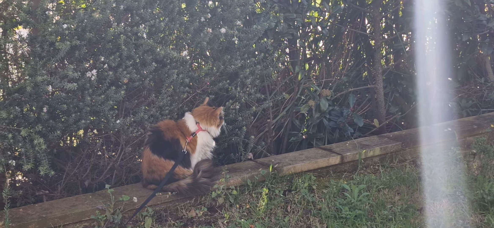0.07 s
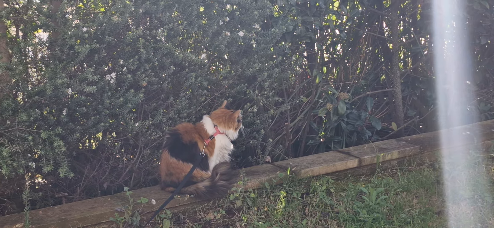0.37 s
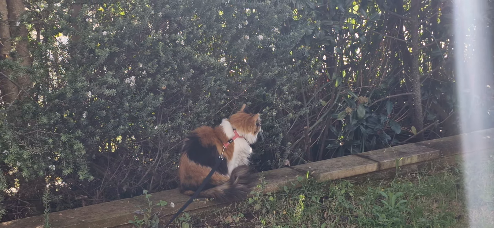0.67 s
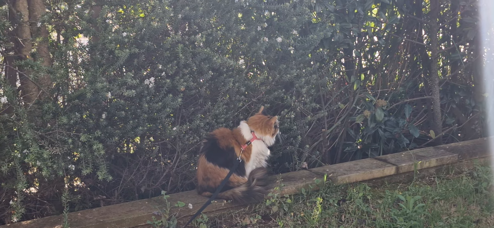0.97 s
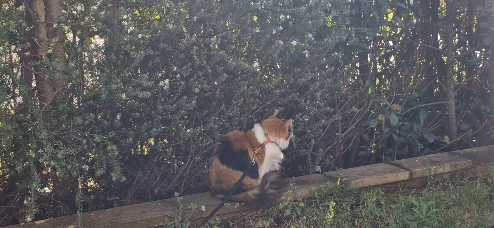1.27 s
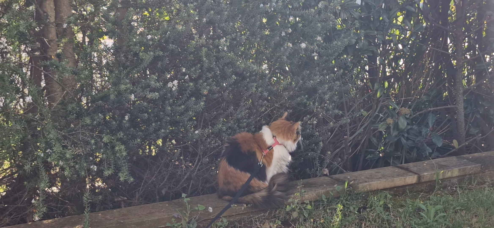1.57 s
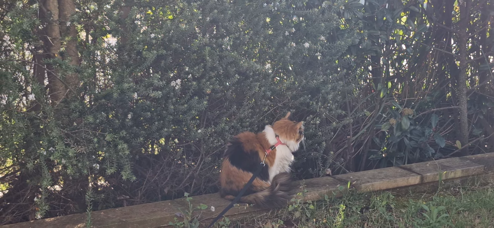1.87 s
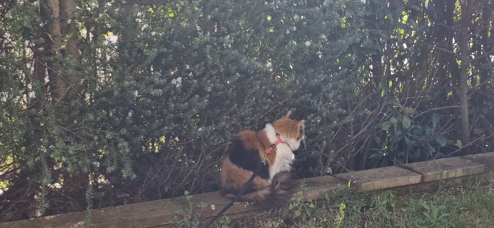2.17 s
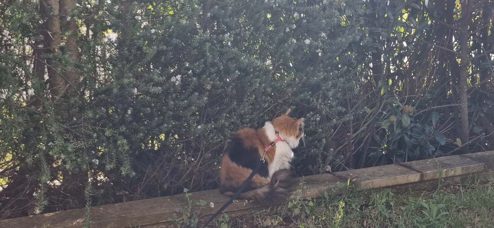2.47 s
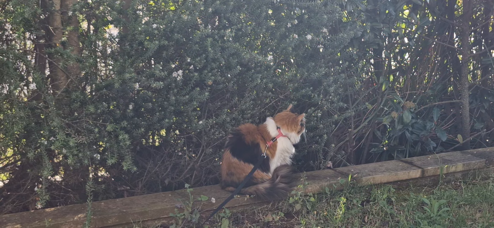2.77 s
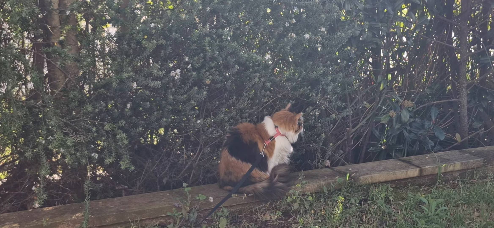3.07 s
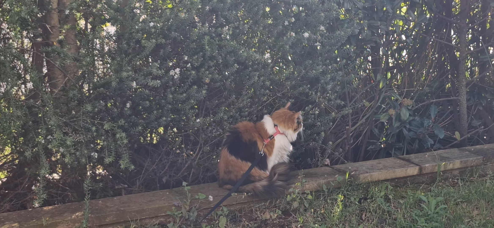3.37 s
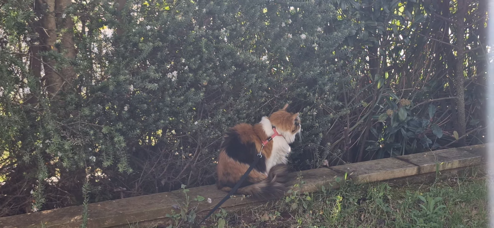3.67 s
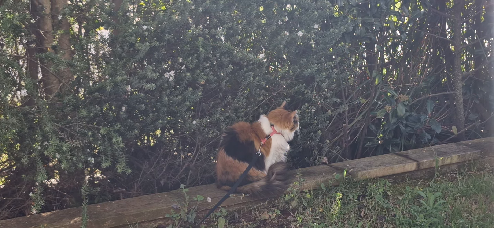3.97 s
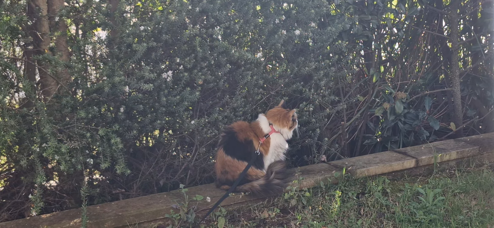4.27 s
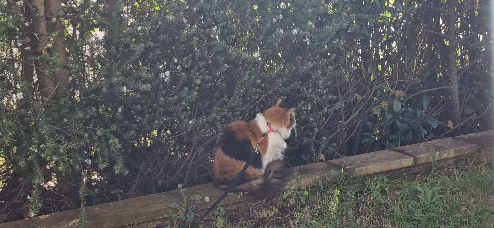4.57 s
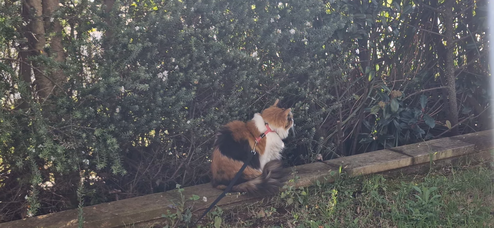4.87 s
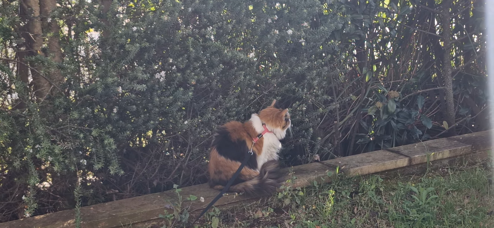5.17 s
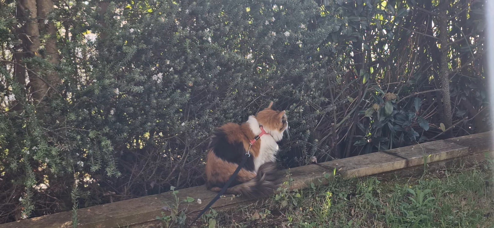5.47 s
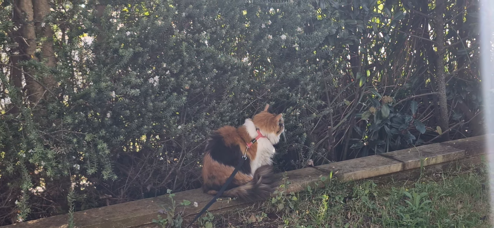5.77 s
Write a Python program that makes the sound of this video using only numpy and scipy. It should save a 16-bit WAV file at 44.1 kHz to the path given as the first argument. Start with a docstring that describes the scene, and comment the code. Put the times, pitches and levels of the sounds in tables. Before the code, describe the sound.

A vehicle passes with a low engine hum that swells and fades, while faint birds chirp in a garden and soft handling ticks sound close by.

```python
"""Coasting past the hedge

A vehicle rolls by behind a garden hedge, its exhaust hum sinking in pitch as the engine slows,
while the tyre noise swells and recedes. Close by, a hand shifts on the camera: sliding skin
gives soft rubs, the slipping grip small ticks. A few small birds chirp over the town's rumble."""
import sys
import numpy as np
from scipy import signal
from scipy.fft import rfft, irfft
from scipy.io import wavfile
from scipy.ndimage import uniform_filter1d

SR = 44100
rng = np.random.default_rng(int(sys.argv[2]) if len(sys.argv) > 2 else 0)


def output_pcm(signal):
    """Save a mono or channel-first signal as 16-bit PCM at the path in sys.argv[1].

    Samples are clipped to [-1, 1] before scaling.
    """
    pcm = np.clip(np.atleast_2d(signal).T, -1, 1) * 32767
    wavfile.write(sys.argv[1], SR, np.round(pcm).astype(np.int16))


N = 265526
TIME = np.arange(N) / SR
ABREAST_S = 2.115  # the vehicle is nearest


# The engine winding down, as its cycle rate: t/s, f/Hz
CYCLE_RATE = [(0.1, 32.2), (0.6, 31.93), (1.28, 31.4), (1.64, 30.4), (2.09, 28.1), (2.21, 28.1),
              (2.5, 27.31), (2.87, 25.8), (3.05, 24.8), (3.55, 23.3), (3.9, 21.7)]
# Fader ride on the exhaust hum: t/s, level/dB
HUM_RIDE = [(0, -38), (.8, -28.5), (1.5, -33), (1.8, -31.5), (2.05, -32), (2.35, -28.5), (2.7, -35),
            (3.05, -31.5), (3.25, -40.5), (3.5, -37), (4, -42.5)]
# Body of the hum, from uneven firings: multiple of the cycle rate, level/dB
HUM_ORDERS = [(2, 0), (3, -6.5), (4, -.5), (5, -8.5), (6, -3), (7, -12)]
# Exhaust and street resonances; an order blooms as it slides through one: f/Hz, level/dB
RESONANCES = [(42, -14.5), (47, 1.5), (52, -10.5), (56, -19), (75, -15), (94, -7.5), (101, -5), (109, -2),
              (114, -21), (120, -4), (127, 4), (151, -14.5), (166, 4), (180, 1), (186, -13), (220, -15.5)]
# Faint upper orders riding on the roar: multiple of the cycle rate, level/dB
UPPER_ORDERS = [(8, -16), (9, -13), (10, -12), (11, -15), (12, -14)]
# Dark EQ of the roar: f/Hz, level/dB
ROAR_EQ = [(40, -12.5), (90, 3.5), (170, 5.5), (225, -7), (290, -0.5), (350, -10.5), (420, -7.5),
           (620, -20), (1200, -24), (3000, -59.5)]

def engine():
    """Uneven firings make a hum that slides through resonances; the exhaust roar pulses with them."""
    sag_hz_per_s, fade_db_per_s = 1.4, 8.5  # it slows and dies away down the street
    gone_s = np.maximum(TIME - CYCLE_RATE[-1][0], 0)
    cycle_hz = curve(CYCLE_RATE) - sag_hz_per_s * gone_s
    angle = 2 * np.pi * np.cumsum(cycle_hz * (1 + 0.0018 * drift(6.8))) / SR
    hum = upper = 0
    for order, db in HUM_ORDERS:
        gain = amp(db + read(RESONANCES, order * cycle_hz) + 0.8 * drift(8.5))
        hum += gain * np.sin(order * angle + 0.13 * drift(3.5))
    for order, db in UPPER_ORDERS:
        gain = amp(db) * (1 + 0.58 * drift(3))
        upper += gain * np.cos(order * angle + 1.2 * drift(3.6))
    roar = amp(2.95) * noise(ROAR_EQ, patchy_db=0.5) * (1 + 0.043 * np.cos(angle))
    hum_db = curve(HUM_RIDE) - fade_db_per_s * gone_s
    roar_db = -41.5 + pass_by(near_s=1.39, loss_db=47.5) + swell(at_s=3.53, half_width_s=0.2, db=4.6)
    return amp(hum_db) * np.sqrt(2) * hum + amp(roar_db) * (roar + np.sqrt(2) * upper)


# Three EQs for the tyre wash (coming, abreast, going): f/Hz, level/dB
COMING_EQ = [(200, -14), (550, -5.5), (850, 3), (1200, -1.5), (1650, 0.5), (2300, -9), (3200, -9.5),
             (4500, -21.5), (6500, -36), (10000, -41.5)]
ABREAST_EQ = [(200, -16.5), (550, 0.5), (800, 1), (1200, -4), (1650, -1), (2400, -4), (3200, -9.5),
              (4500, -20), (6500, -29.5), (10000, -38)]
GOING_EQ = [(200, 2), (600, -15), (850, 1), (1150, 1.5), (1400, 4.5), (1650, -2), (2300, -9), (3200, -15.5),
            (4500, -26.5), (7000, -42.5)]

def tyres():
    """Tyres on the road: a wash that changes colour as the vehicle comes, draws level and goes."""
    solo_s = [1.8, 2.7, 3.9]  # each EQ plays alone here, with crossfades between
    road = 0
    for share, eq in zip(np.eye(3), [COMING_EQ, ABREAST_EQ, GOING_EQ]):
        crossfade = np.sqrt(np.interp(TIME, solo_s, share))
        road += crossfade * noise(eq, patchy_db=1.2, size=1024)
    ride_db = pass_by(near_s=1.017, loss_db=26.5) + swell(at_s=4.14, half_width_s=0.51, db=5.15)
    return road * amp(-47 + ride_db + 0.6 * drift(3.2))


# Finger strokes on the case: t/s, length/s, level/dB
RUB_CUES = [(.74, .72, -73.5), (1.68, 0.55, -73), (2.14, 0.33, -65.5), (2.5, 0.61, -69.5),
            (3.386, 0.37, -66), (5.773, 0.22, -66.5)]
# Bright EQ of the rubs: f/Hz, level/dB
RUB_EQ = [(1500, -17.5), (3500, 12), (5500, 5.5), (7000, 0), (8500, -1.5), (10000, -8.5), (12500, 2),
          (15500, -3)]
# Narrower EQ of the swish: f/Hz, level/dB
SWISH_EQ = [(2500, -30.5), (3900, -2), (4600, 5.5), (5300, -2.5), (6250, -1.5), (6800, -13), (7900, -15),
            (9800, -35), (12600, -18), (13800, -24), (15200, -15.5), (16200, -34)]

def hand_rubs():
    """Skin slides on the case in a fine grainy hiss; one longer stroke swishes on the right."""
    strokes = [amp(db) * stroke(start, length, edge_s=0.13) for start, length, db in RUB_CUES]
    pressure = np.sqrt(sum(envelope ** 2 for envelope in strokes))
    grain = amp(2.5 + 0.8 * drift(150))
    rub = pressure * grain * noise(RUB_EQ, patchy_db=0, size=256)
    swish_s, slacken_db_per_s = 2.48, 16.5
    swish_db = -55.5 - slacken_db_per_s * (TIME - swish_s) + drift(60)
    swish_gain = stroke(swish_s, length_s=1.0, edge_s=0.25) * amp(swish_db)
    swish = swish_gain * noise(SWISH_EQ, patchy_db=2.5, size=512)
    return rub + swish * pan(-7.5)


# Small dry ticks of the case: t/s, level/dB, ring f/Hz, ring width/Hz
TICK_CUES = [(2.2702, -47, 13990, 4000), (2.2815, -42, 14000, 3000), (2.2952, -33, 3100, 2500),
             (2.3103, -41, 4500, 7000), (2.324, -41, 12500, 3000), (2.332, -28, 3700, 1900),
             (2.3306, -39, 13600, 4000), (2.356, -32, 2820, 1500), (2.3562, -37, 5340, 2000),
             (2.412, -48.5, 5960, 9000), (3.503, -48, 5430, 1200), (4.1362, -43, 14200, 4480),
             (5.172, -54, 12500, 4920), (5.188, -36, 1150, 2600), (5.188, -54, 9500, 6000),
             (5.325, -60, 7600, 900), (5.63, -57, 12800, 5000), (5.8, -42.5, 1990, 1200),
             (5.899, -51, 13500, 7000)]

def grip_ticks():
    """The grip sticks and slips in ticks, the higher ones shorter, and softly bumps the case once."""
    hits = [(start, case_hit(db, hz, width, decay_s=0.0019 * (4000 / hz) ** 0.36))
            for start, db, hz, width in TICK_CUES]
    hits.append((5.812, case_hit(db=-38.5, hz=298, width_hz=540, decay_s=0.048)))  # the bump
    track = np.zeros((2, N))
    for start, hit in hits:
        for channel, sound in zip(track, hit):
            add(channel, start, sound)
    return track * pan(-2.3)


def case_hit(db, hz, width_hz, decay_s):
    """A snap and a dying noise burst ring one resonance of the case, in stereo."""
    t = np.arange(4096) / SR
    shared, left, right = rng.standard_normal((3, len(t))) * np.exp(-t / decay_s)
    snap = 5 * (t == 0)
    excitation = snap + shared + 0.86 * np.array([left, right])
    detune = (np.fft.rfftfreq(len(t), 1 / SR) - hz) / (width_hz / 2)
    hit = irfft(rfft(excitation) / (1 + 1j * detune) ** 2)
    return hit * amp(db) / abs(hit.mean(0)).max()


# A sprinkle of faint chirps: t/s, length/s, f/Hz, glide/octaves, level/dB
CHIRP_CUES = [(0.253, 0.047, 4700, -0.073, -58), (0.327, 0.064, 4670, -.08, -53),
              (0.408, 0.025, 4050, -.2, -55), (0.672, 0.028, 4600, -0.0038, -57),
              (0.753, 0.039, 3730, .22, -58), (1.684, 0.021, 3350, 0.33, -48),
              (1.902, 0.026, 4660, -.04, -56.5), (3.181, 0.054, 4480, -0.23, -53),
              (4.19, 0.049, 4190, 0.12, -59), (4.278, .039, 4690, -.1, -58),
              (4.311, .021, 3200, -0.077, -57), (4.355, 0.033, 4640, -0.4, -55),
              (4.411, 0.043, 3290, -.25, -54.5), (5.3, .05, 5200, -0.043, -66),
              (5.391, 0.021, 4740, -.03, -61), (5.432, 0.054, 5180, .04, -67),
              (5.665, .022, 3400, 0.06, -58), (5.763, 0.039, 4340, -0.13, -57.5),
              (5.805, .05, 4180, .3, -55), (5.835, 0.034, 4690, -0.45, -53)]

def birds():
    """Short arched chirps with a raspy quaver, heard mostly as scatter from the garden."""
    arch_octaves = 0.04  # each chirp starts and ends this far under its glide
    song = np.zeros(N)
    quaver = 1 + 0.025 * drift(450)
    for start, length, pitch, glide, db in CHIRP_CUES:
        position = np.linspace(-0.5, 0.5, round(length * SR))
        octaves = glide * position - arch_octaves * (2 * position) ** 2
        hz = pitch * 2 ** octaves * quaver[round(start * SR):][:len(position)]
        envelope = amp(db) * np.cos(np.pi * position)
        add(song, start, envelope * np.sin(2 * np.pi * np.cumsum(hz) / SR))
    return amp(-1.5) * song + amp(3) * garden(song, t60_s=0.4)


def garden(sound, t60_s):
    """Diffuse scatter from hedge, fence and walls, different in each ear."""
    t = np.arange(SR // 2) / SR
    tail = rng.standard_normal((2, len(t))) * amp(-60 * t / t60_s)
    return signal.fftconvolve(sound[None], tail / np.linalg.norm(tail[0]), axes=1)[:, :N]


# Low bed of far traffic: f/Hz, level/dB
RUMBLE_EQ = [(15, -26.5), (33, -18.5), (52, -6.5), (65, 1), (88, -8), (115, -5), (170, -6), (215, -17.5),
             (270, -13), (450, -19), (620, -23), (1000, -24), (1700, -31.5), (3000, -35.5)]
# Air on top, the town's treble and microphone hiss: f/Hz, level/dB
AIR_EQ = [(4000, -39), (4750, -41.5), (5400, -48), (6600, -55.5), (8500, -58), (9700, -66), (12500, -57.5),
          (15500, -61.5)]
# Tones of a far machine under the traffic: f/Hz, level/dB
DRONE_TONES = [(64.5, -46.5), (108, -61.5)]

def town():
    """Far traffic rumbles steadily under a thin hiss, and a distant machine drones and wavers."""
    drone = 0
    for hz, db in DRONE_TONES:
        gain = amp(db) * (1 + 0.25 * drift(9.3))
        drone += gain * np.sin(2 * np.pi * hz * TIME + 0.64 * drift(2.9))
    return amp(-41) * noise(RUMBLE_EQ + AIR_EQ, patchy_db=2, size=4096) + np.sqrt(2) * drone


# Stereo image of the noise layers, centred bass and wide top: f/Hz, left-right correlation
STEREO_IMAGE = [(30, 0.84), (150, 0.98), (280, 0.88), (450, 0.66), (680, 0.2), (880, -0.016), (1650, -0.12),
                (2300, 0.18), (4000, 0)]

def noise(eq, patchy_db, size=2048):
    """Stereo noise shaped by an EQ, with drifting patches; its mono mix has rms 1."""
    hz = np.fft.rfftfreq(size, 1 / SR)
    a, b, c, d, patches = rng.standard_normal((5, 4 * N // size + 5, len(hz)))
    patches = uniform_filter1d(patches, size=8, axis=0)  # smooth in time
    patches = unit(uniform_filter1d(patches, size=8, axis=1))  # and in frequency
    likeness = np.clip(read(STEREO_IMAGE, hz), -1, 1)
    left = a + 1j * b
    right = likeness * left + np.sqrt(1 - likeness ** 2) * (c + 1j * d)
    frames = np.array([left, right]) * amp(read(eq, hz) + patchy_db * patches)
    _, sound = signal.istft(frames.transpose(0, 2, 1), nperseg=size, noverlap=size - size // 4)
    return sound[:, :N] / sound[:, :N].mean(0).std()


def pass_by(near_s, loss_db):
    """Drive-by in dB: loss_db per tenfold distance; it covers its nearest distance in near_s."""
    distance = np.hypot(1, (TIME - ABREAST_S) / near_s)
    return -loss_db * np.log10(distance)


def swell(at_s, half_width_s, db):
    """A brief bell-shaped lift, in dB."""
    return db * np.exp(-((TIME - at_s) / half_width_s) ** 2)


def stroke(start_s, length_s, edge_s):
    """Envelope of one slide: soft attack, hold, soft release."""
    ramp = np.clip(np.minimum(TIME - start_s, start_s + length_s - TIME) / edge_s, 0, 1)
    return np.sin(np.pi / 2 * ramp) ** 2


def drift(hz):
    """Random wander of rms 1, rolled off above hz."""
    f = np.fft.rfftfreq(N, 1 / SR)
    return unit(irfft(rfft(rng.standard_normal(N)) * np.exp(-(f / hz) ** 2), N))


def amp(db):
    """Decibels to gain."""
    return 10 ** (np.asarray(db) / 20)


def unit(x):
    """Scales to rms 1."""
    return x / np.sqrt(np.mean(x ** 2) + 1e-20)


def curve(rows):
    """Automation: rows of t/s, value, drawn out to every sample."""
    return np.interp(TIME, *np.transpose(rows))


def read(points, hz):
    """A spectrum's value at hz, on a log-frequency axis."""
    f, value = np.transpose(points)
    return np.interp(np.log(hz + 1), np.log(f), value)


def pan(lean_db):
    """Left and right gains for a left-minus-right level."""
    return amp(np.array([[lean_db], [-lean_db]]) / 2)


def add(mix, start_s, sound):
    """Drops a sound into the mix at start_s."""
    part = mix[max(round(start_s * SR), 0):][:len(sound)]
    part += sound[:len(part)]


def scene():
    """The vehicle, the close hand, and the birds and town behind them."""
    return engine() + tyres() + hand_rubs() + grip_ticks() + birds() + town()


# Microphone port balance, the left duller in two treble bands: f/Hz, left-minus-right level/dB
PORT_BALANCE = [(30, -7.5), (100, 2.94), (350, -0.2), (650, -0.4), (1800, 0), (2400, -7), (3200, -10.5),
                (4700, -9), (7000, -2), (9500, 2.5), (11000, -2), (13000, -10), (15700, 1)]

def record(dry):
    """The two microphone ports colour the sound differently; a steep low-pass trims the top."""
    top_hz = 15900
    lean = amp(read(PORT_BALANCE, np.fft.rfftfreq(2 * N, 1 / SR)))
    ports = np.array([lean, np.ones_like(lean)]) * np.sqrt(2 / (1 + lean ** 2))
    heard = irfft(rfft(dry, 2 * N) * ports)[:, :N]
    low_pass = signal.firwin(511, top_hz, window=("kaiser", 9), fs=SR)
    return signal.oaconvolve(heard, low_pass[None], "same")


dry = scene()
out = record(dry)
output_pcm(out)
```